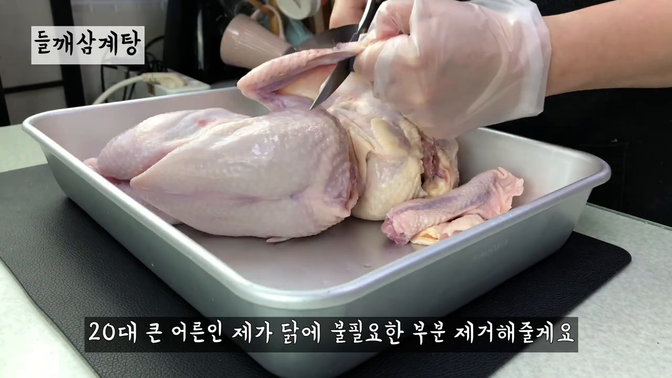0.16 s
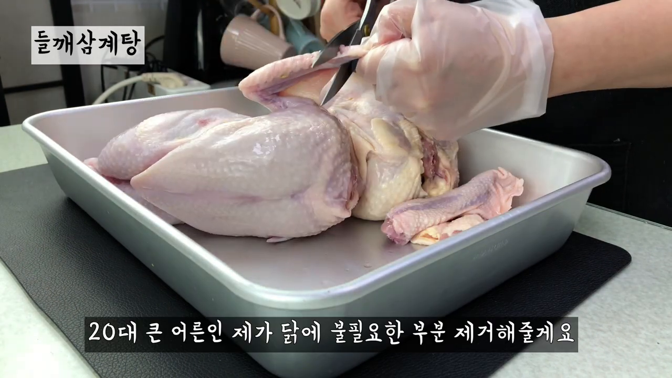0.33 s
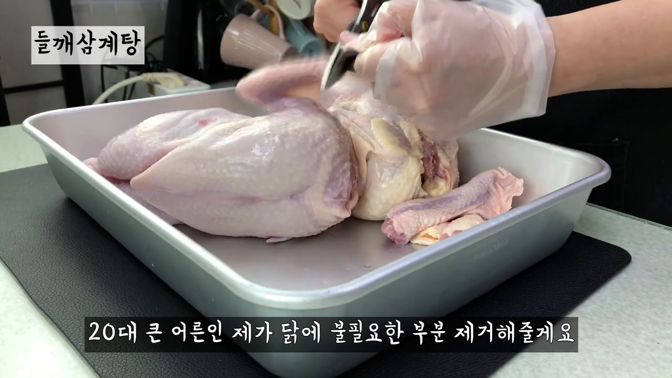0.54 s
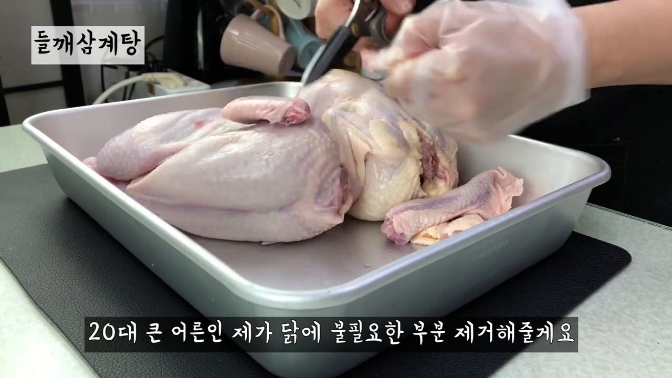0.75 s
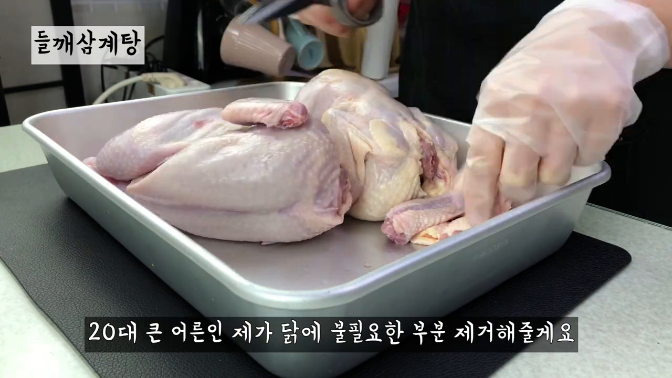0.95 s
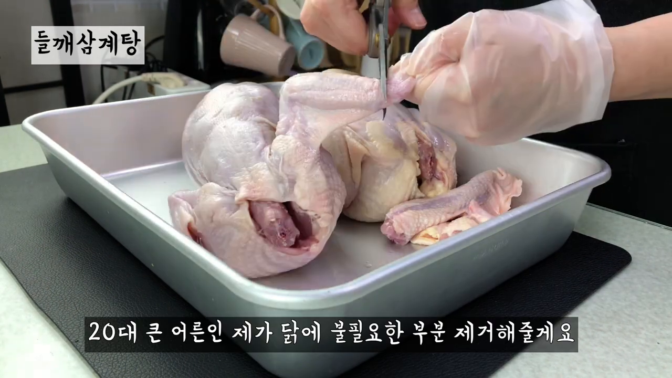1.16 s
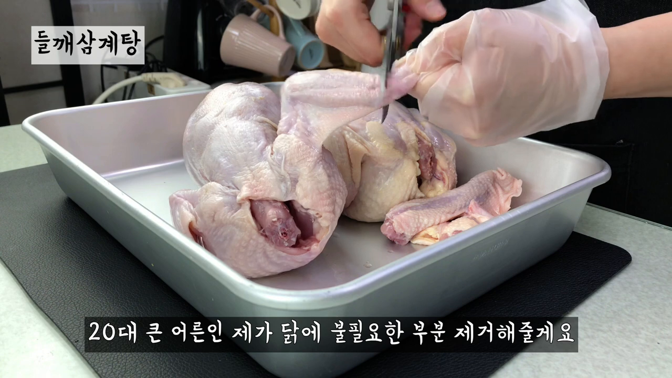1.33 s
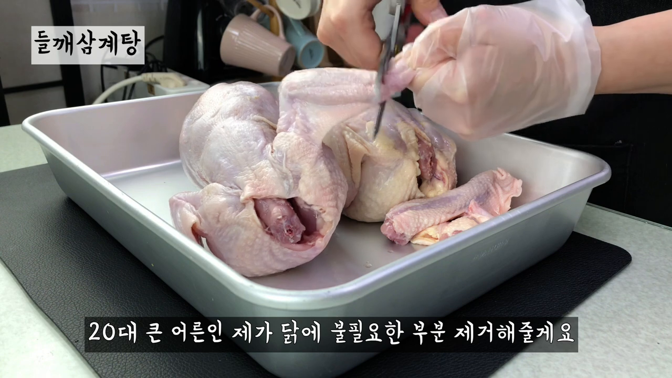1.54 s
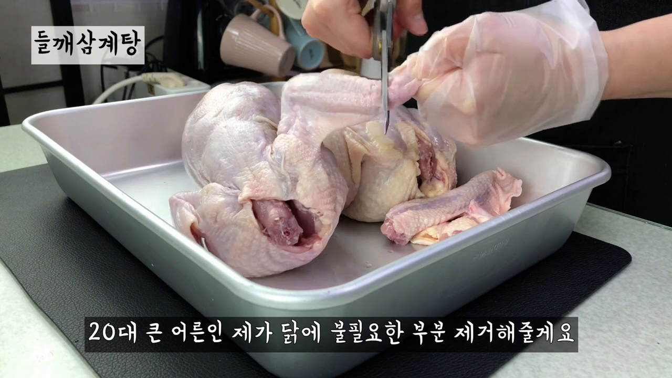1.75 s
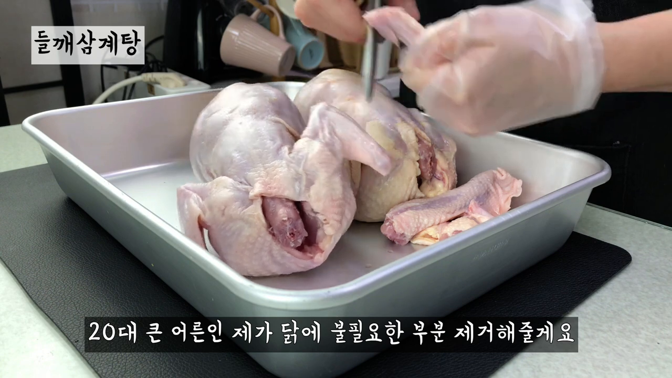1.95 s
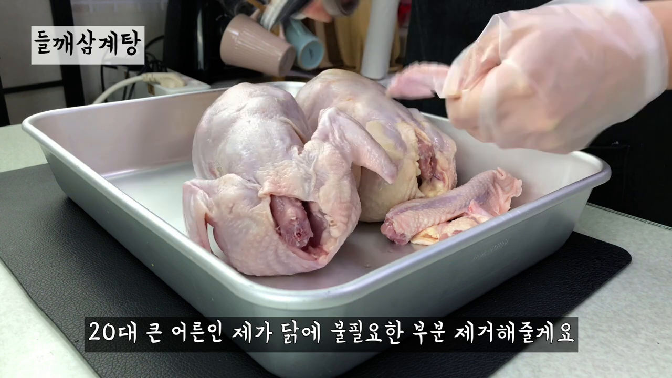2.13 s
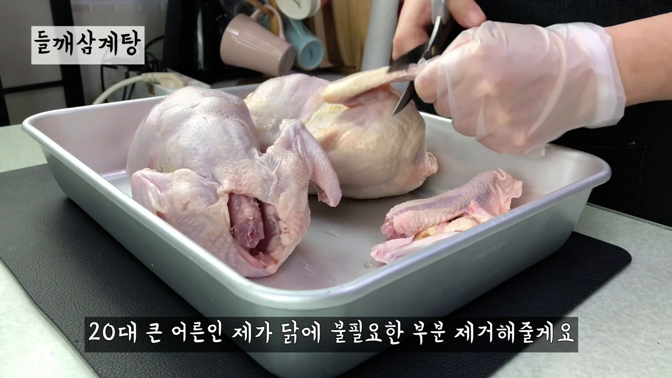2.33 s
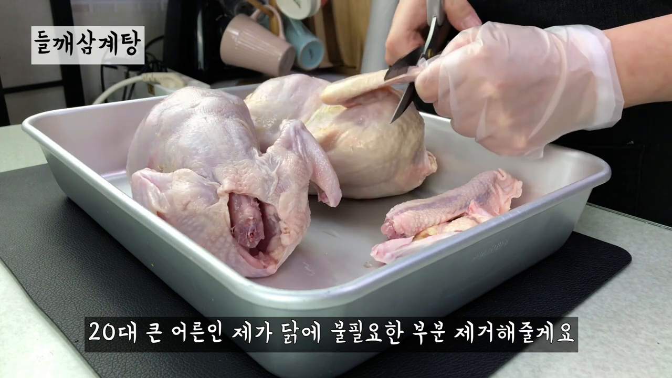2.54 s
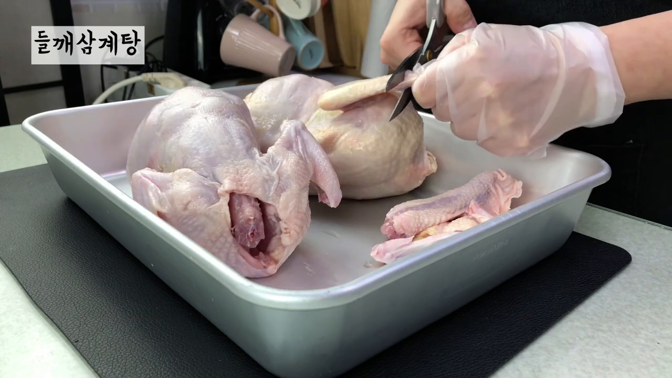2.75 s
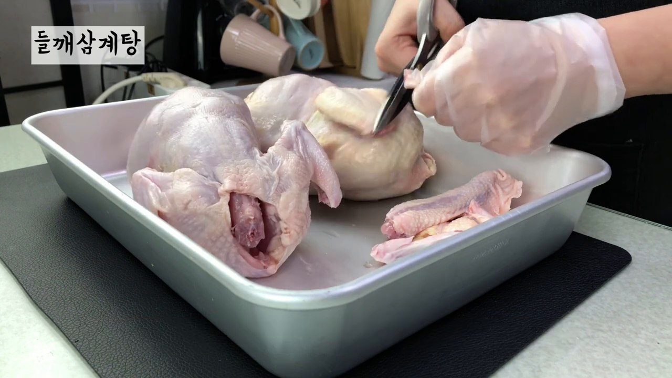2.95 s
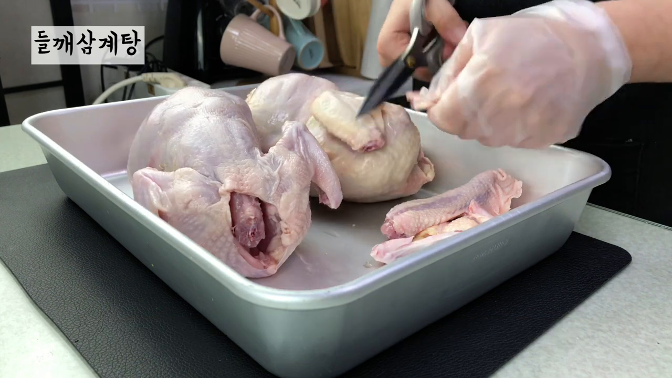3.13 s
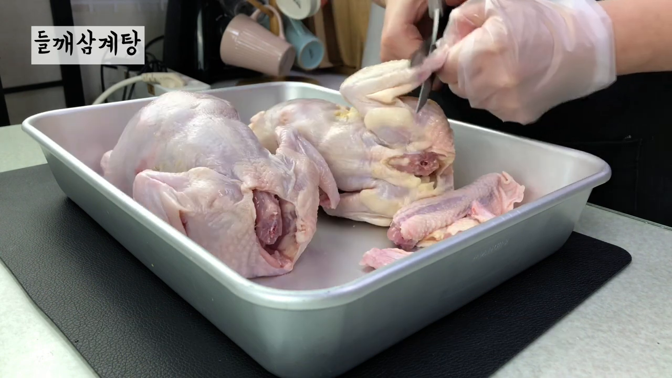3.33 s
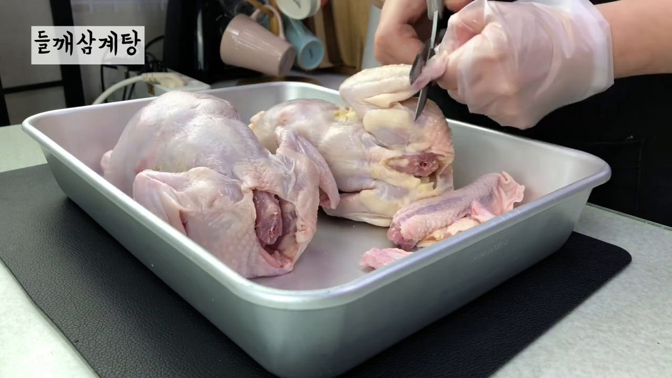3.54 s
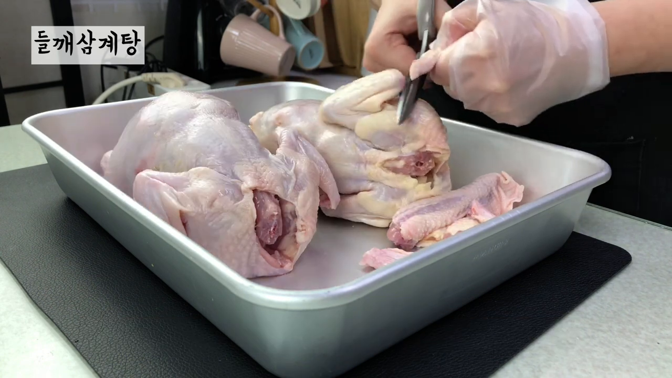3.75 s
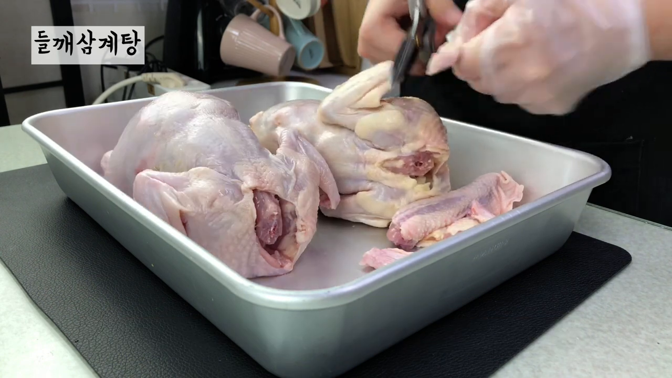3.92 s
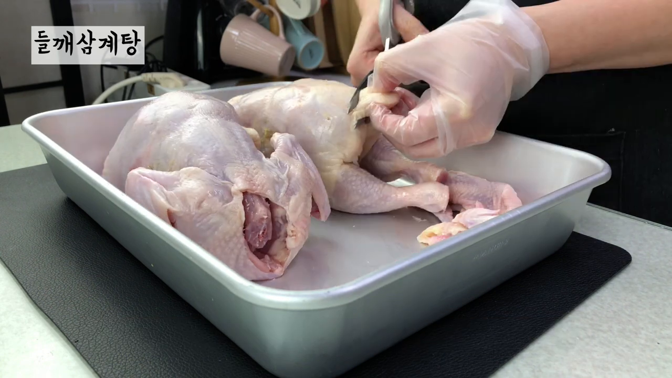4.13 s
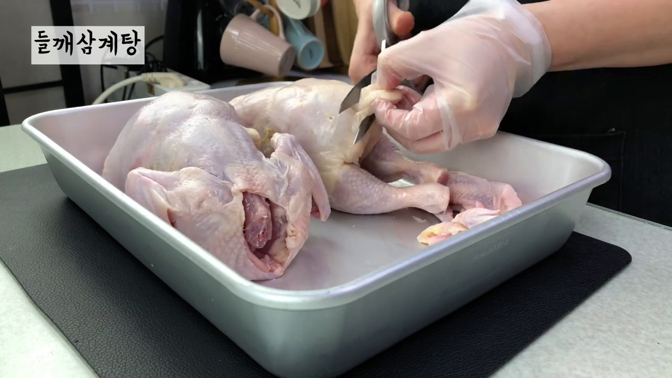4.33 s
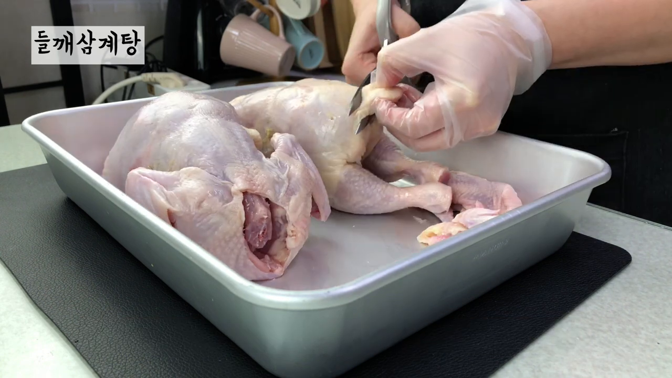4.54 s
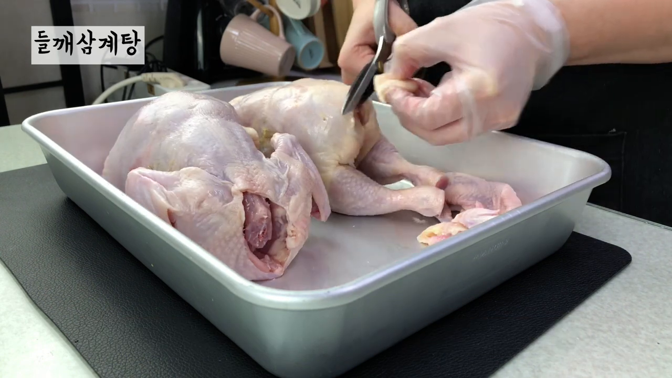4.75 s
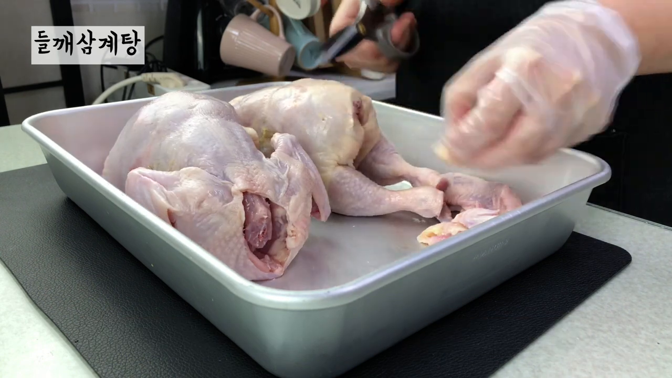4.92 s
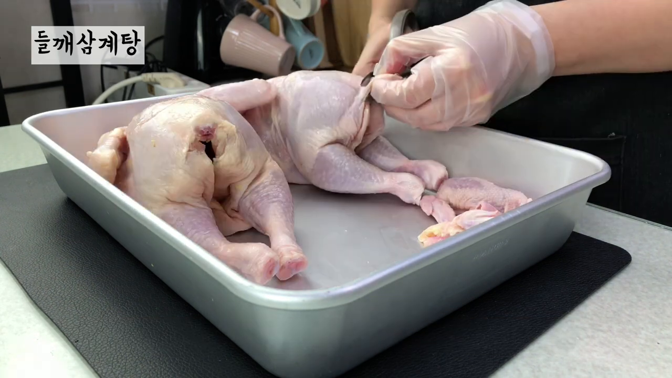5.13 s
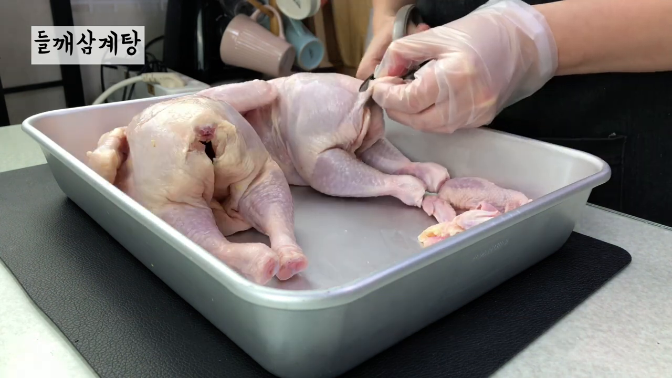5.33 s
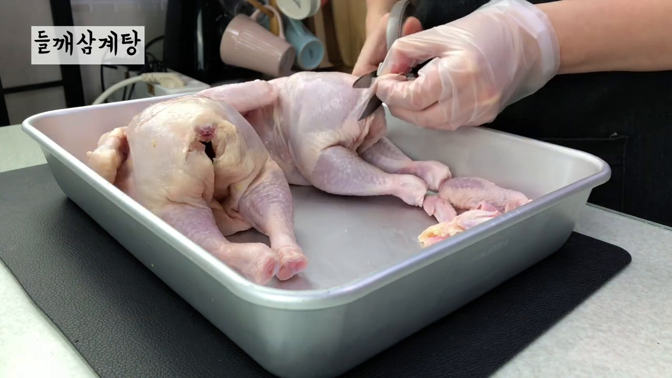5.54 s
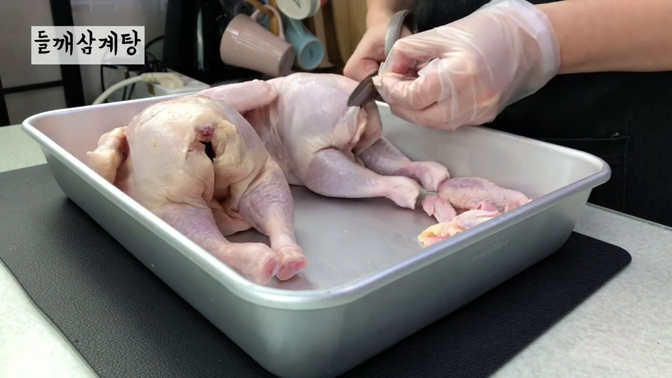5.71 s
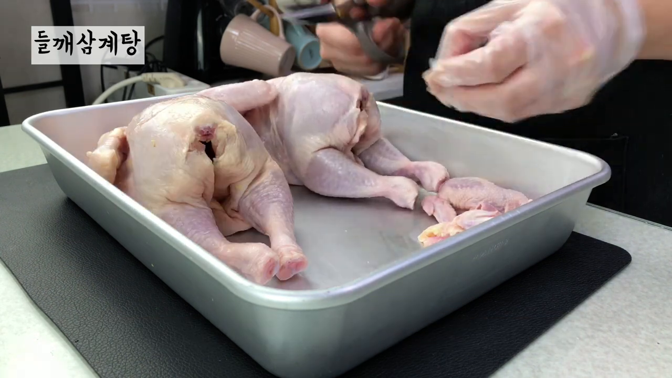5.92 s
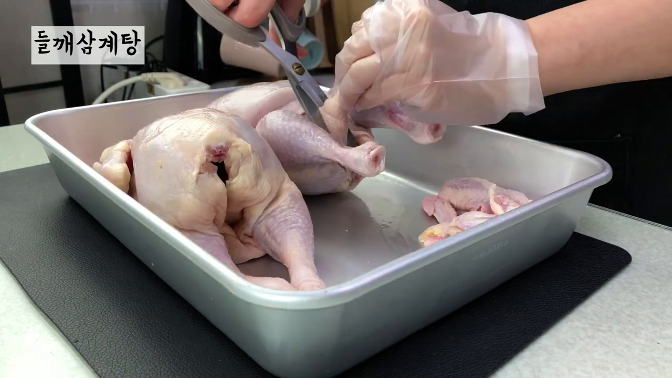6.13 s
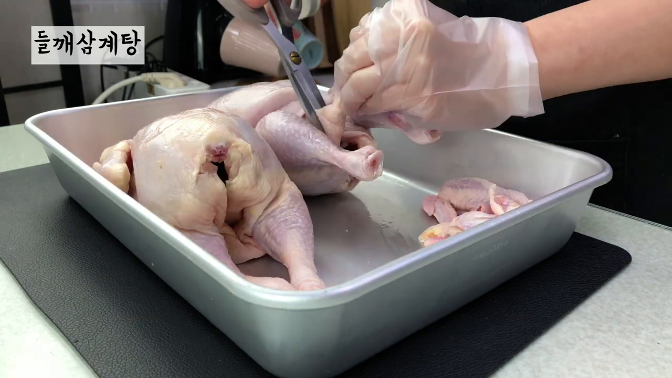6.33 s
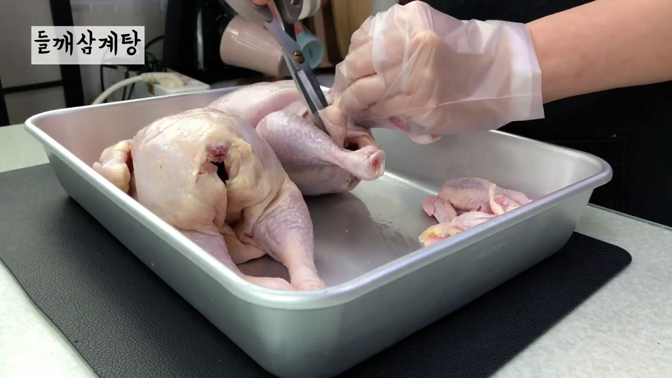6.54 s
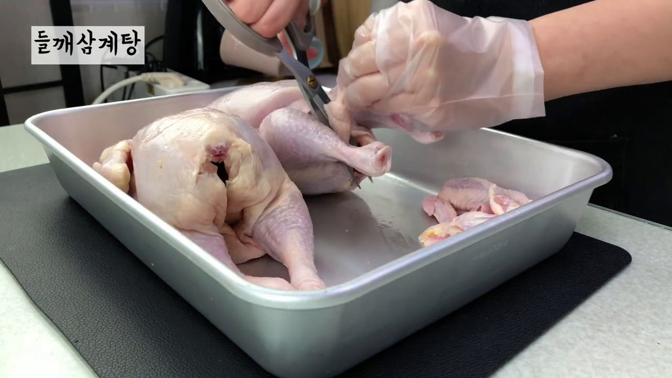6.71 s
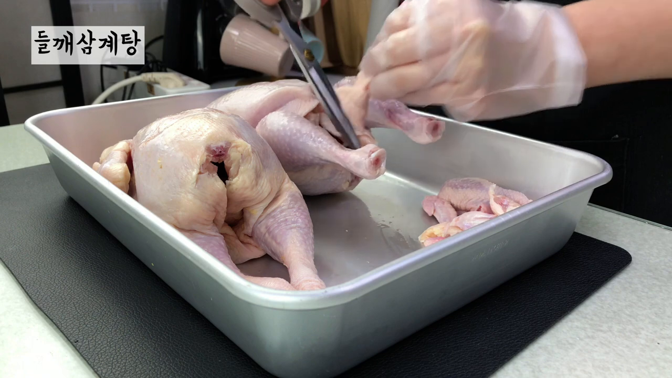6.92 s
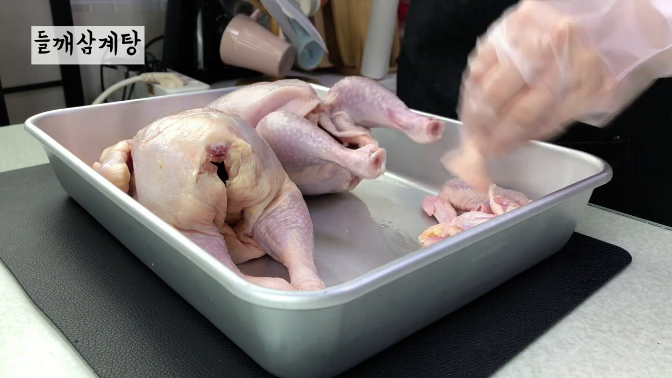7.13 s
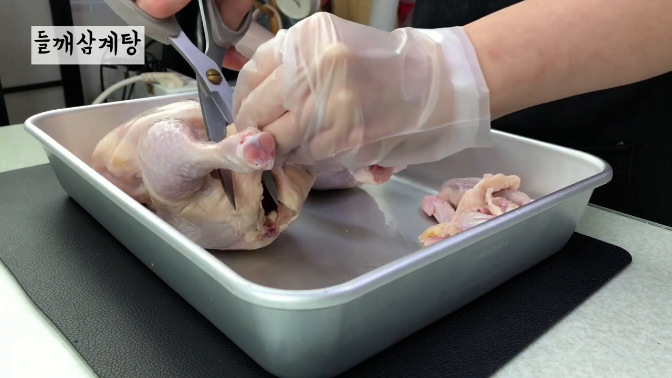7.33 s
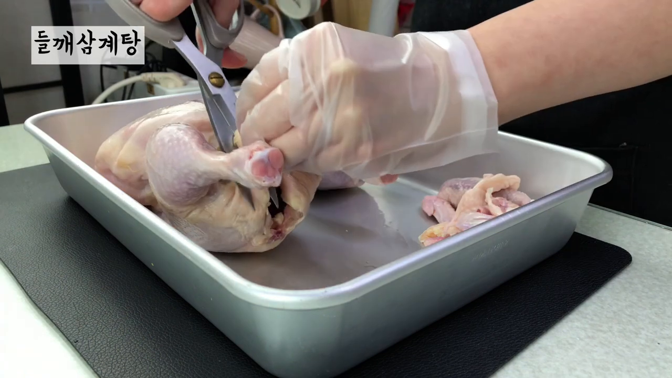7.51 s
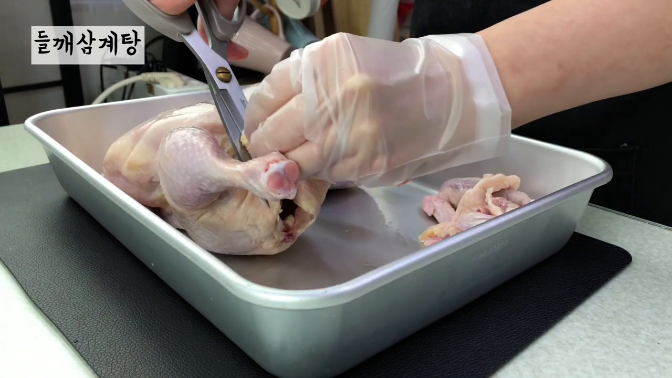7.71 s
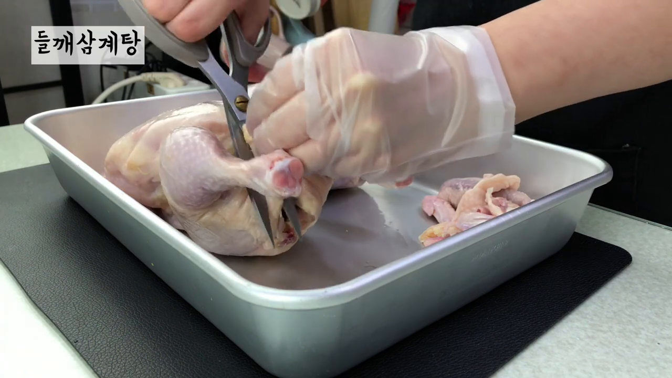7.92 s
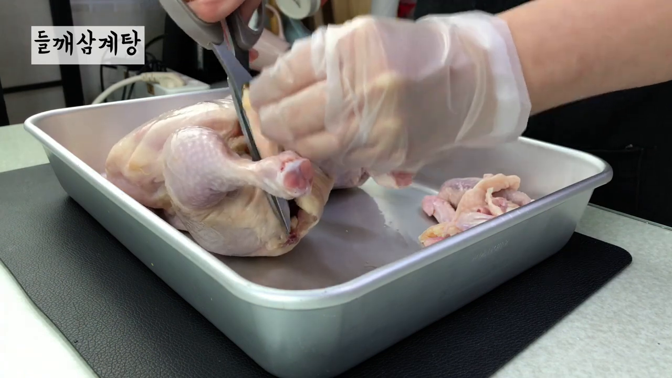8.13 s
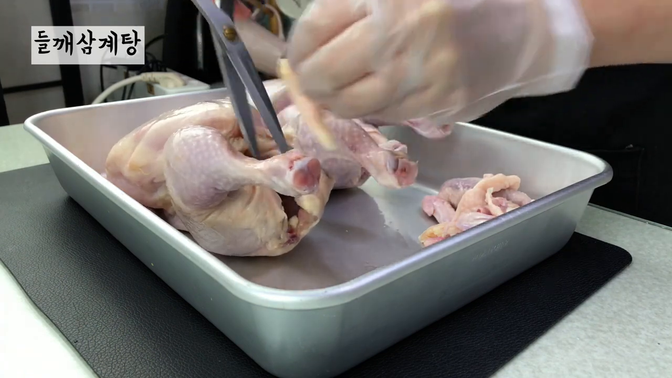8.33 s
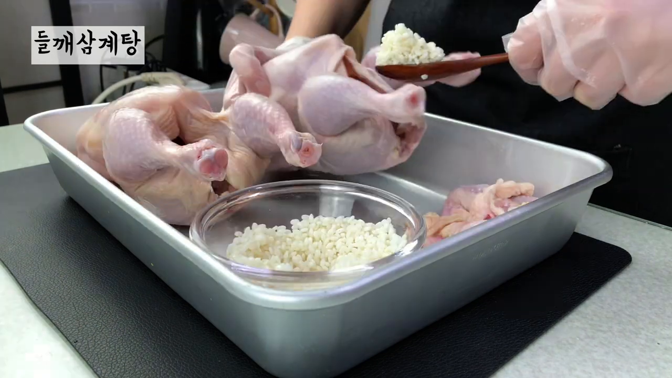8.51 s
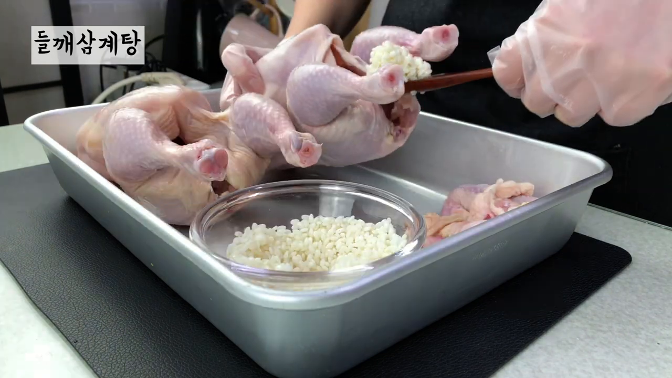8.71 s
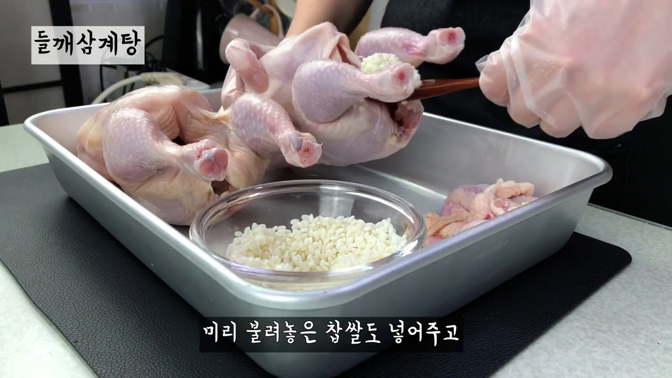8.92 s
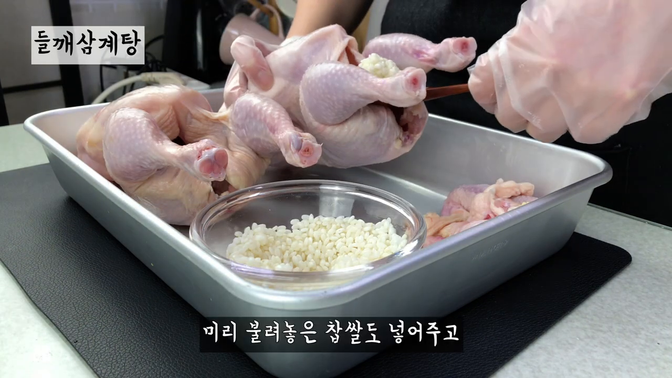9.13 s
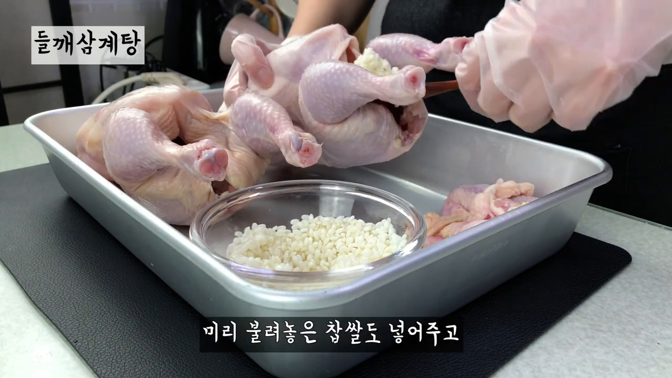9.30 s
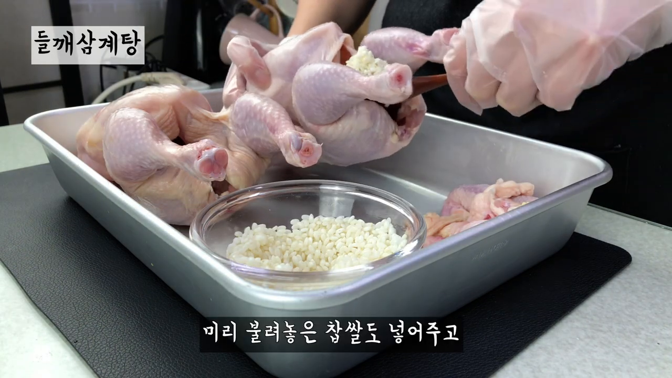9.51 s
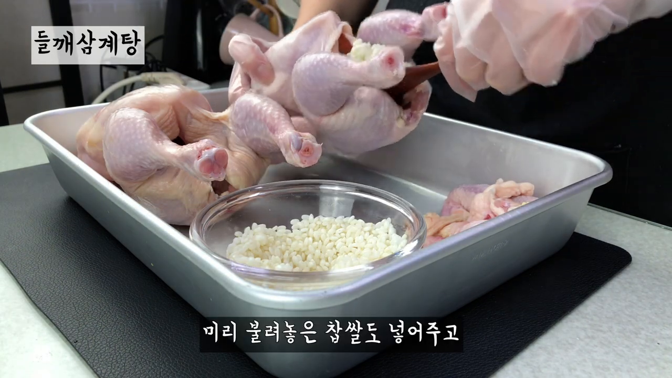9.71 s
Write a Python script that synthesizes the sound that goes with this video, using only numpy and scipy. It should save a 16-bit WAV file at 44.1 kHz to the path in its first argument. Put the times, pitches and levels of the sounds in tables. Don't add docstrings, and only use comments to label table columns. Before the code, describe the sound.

Eight loud metallic scissor snips cut raw poultry over a steel tray, small cracks and plastic glove rustles between them, in a hard kitchen.

```python
import sys
import numpy as np
from scipy import signal
from scipy.fft import rfft, irfft
from scipy.io import wavfile
from scipy.ndimage import uniform_filter1d

SR = 44100
rng = np.random.default_rng(int(sys.argv[2]) if len(sys.argv) > 2 else 0)


def rack_gain(trim_db):
    fader = np.asarray(trim_db, float)
    return 10 ** (fader / 20)


def log_audio(samples):
    frames = np.atleast_2d(samples).T
    limited = np.clip(frames, -1, 1)
    pcm = np.round(limited * 32767).astype(np.int16)
    wavfile.write(sys.argv[1], SR, pcm)


N = 434826

# pitch in Hz, width in Hz, level in dB.
BLADES = [(1477, 9.6, -12), (2460, 1080, -13), (3300, 310, -11.5), (4650, 990, -8.5), (5270, 200, -6),
          (6000, 1100, 2.5), (7500, 730, -3.5), (7500, 1700, -5), (8760, 470, -3), (11000, 940, -15),
          (12430, 1320, -63), (15300, 970, -67)]
# pitch in Hz, width in Hz, level in dB.
KNOCK = [(417, 590, -21.5), (964, 200, 7.5), (1430, 2300, 0)]
SILENT_DB = -15.5


def evened(x):
    return x / np.sqrt(np.mean(x ** 2) + 1e-20)


def read(points, hz):
    f, value = np.transpose(points)
    return np.interp(np.log(hz + 1), np.log(f + 1), value)


def add(mix, s, sound):
    part = mix[round(s * SR):][:len(sound)]
    part += sound[:len(part)]


def unroll(rows):
    s, *columns = np.transpose(rows)
    t = np.arange(s[0], s[-1], 1 / SR)
    return s[0], [np.interp(t, s, c) for c in columns]


def slow_noise(shape, size):
    return evened(uniform_filter1d(rng.standard_normal(shape), size))


def resonate(x, hz, width):
    turn = np.exp(2j * np.pi * np.cumsum(hz * np.ones(len(x))) / SR)
    r = np.exp(-np.pi * width / SR)
    return 2 * (turn * signal.lfilter([1 - r], [1, -r], x / turn)).real


def ring(x, modes, shift=1):
    return sum(rack_gain(db) * resonate(x, hz * shift, width) for hz, width, db in modes)


def colour(x, gain_db):
    return irfft(rfft(x) * rack_gain(gain_db(np.fft.rfftfreq(len(x), 1 / SR))), len(x))


def dull_cut(x, hz):
    return signal.lfilter(*signal.butter(N=2, Wn=hz, btype="high", fs=SR), x)


def grains(count, per_s, spread_db, smooth):
    size = rack_gain(spread_db * np.minimum(rng.exponential(1, count), 4)) * rng.standard_normal(count)
    slips = size * (rng.random(count) < per_s / SR)
    return evened(slips) + smooth * rng.standard_normal(count)


def hiss():
    # frequency in Hz, level in dB per Hz.
    hiss_colour = [(18, -40), (30, -2.5), (152, 4.5), (270, 3), (468, -1.5), (562, 1), (855, -0.5),
                   (924, 2.5), (1270, 3.5), (2080, -7), (4000, -5), (5060, -6.5), (15600, -14),
                   (15950, -36)]
    # centre in Hz, width in Hz, level in dB.
    fans = [(125.6, 79, 1), (396, 330, -8), (1028, 24, -7.5), (1235, 22.3, 4.5), (3420, 72, -10),
            (4043, 153, -4), (9160, 600, -18), (10500, 500, -15)]
    # time in seconds, level in dB.
    fan_load = [(0, -1), (0.71, 4), (1.34, -0.5), (1.46, -5), (2.14, -26), (2.28, 6), (2.44, 0), (4.2, 3),
                (4.67, -3), (5.46, 3.5), (6.65, -0.5), (9.86, 1)]
    # time in seconds, level in dB, running water in dB against the hiss.
    drift = [(0, -66, -12), (1.05, -65.5, -8), (1.6, -67, -5), (2.15, -67, -3.5), (2.3, -66, 2),
             (3, -65.5, 2), (4.2, -65.5, -4), (6.9, -65, 2), (8.3, -65.5, 6), (8.5, -64.5, 12),
             (9.4, -65, 12.5), (9.86, -63.5, 12.5)]
    # frequency in Hz, level in dB per Hz.
    water_colour = [(500, -46), (1000, -6.5), (1700, 1), (2500, -2.5), (5000, -18), (10000, -20)]
    wander_db = 1.5

    frames, hz = N // 256 + 5, np.fft.rfftfreq(1024, 1 / SR)
    a, b, patches = rng.standard_normal((frames, 513, 3)).T
    patches = evened(uniform_filter1d(uniform_filter1d(patches, 10, 0), 14, 1))
    s, level_db, water_db = np.transpose(drift)
    t = np.arange(frames) * 256 / SR

    wander = slow_noise((len(fans), frames), 60)
    wander[3] = .4 * wander[3] + np.interp(t, *np.transpose(fan_load)) / wander_db
    bands = 0
    for (f, width, db), w in zip(fans, wander):
        shape = 1 / (1 + (2 * (hz - f) / (width + 15)) ** 2) ** 2
        bands = bands + rack_gain(2 * (db + 3.5)) * shape[:, None] * rack_gain(2 * wander_db * w)

    water = rack_gain(2 * (read(water_colour, hz)[:, None] - 20.5 + np.interp(t, s, water_db)))
    power = 0.22 * rack_gain(2 * read(hiss_colour, hz))[:, None] + bands
    z = (a + 1j * b) * np.sqrt((power + water) / power.mean())
    z *= rack_gain(np.interp(t, s, level_db)) * rack_gain(.8 * patches)
    return rack_gain(15.5) * signal.istft(z, nperseg=1024, noverlap=768)[1][:N] / np.sqrt(1024)


def hum():
    # pitch in Hz, level in dB rms.
    tones = [(118.4, -82), (398.4, -68), (1012, -68), (1206, -64.5), (1308, -65.5)]
    waver = slow_noise((len(tones), N), 9000)
    hz, db = np.transpose(tones)[:, :, None]
    turns = np.cumsum(hz * (1 + .006 * waver), axis=1) / SR
    return (rack_gain(db - 3.0) * np.sin(2 * np.pi * turns)).sum(axis=0)


def kitchen(x):
    # frequency in Hz, time to die by 60 dB in seconds.
    decay = [(500, 0.36), (1300, 0.41), (3500, 0.37), (6500, 0.34), (9500, 0.29), (14000, 0.23)]
    # delay in seconds, level in dB against the whole tail.
    echoes = [
        (.0128, -12),
        (.0155, -7),
        (.0192, -12),
    ]
    gap_s = .0125
    first_wall_db, first_wall_s = 3, 0.0243

    taps = np.zeros(SR // 3)
    at = np.arange(0, SR // 3 - 6, 6)
    sizes = rng.choice([-1., 1.], len(at)) * rack_gain(2 * rng.standard_normal(len(at)))
    taps[at + rng.integers(0, 6, len(at))] = sizes
    taps *= rack_gain(1.3 * slow_noise(len(taps), 120))
    hz, t, z = signal.stft(taps, SR, nperseg=256)
    tail = signal.istft(z * rack_gain(-60 * t / read(decay, hz)[:, None]), SR, nperseg=256)[1]

    t = np.arange(len(tail)) / SR
    tail = tail * np.interp(t, [0, gap_s - .0015, gap_s], [.5, .22, 1])
    tail = tail * rack_gain(first_wall_db * np.exp(-np.maximum(t - gap_s, 0) / first_wall_s))
    tail = tail / np.linalg.norm(tail)
    for s, db in echoes:
        tail[round(s * SR * rng.uniform(.98, 1.02))] += rack_gain(db - 6.5)
    return signal.fftconvolve(x, tail)[:N]


def thud(s, peak_db, hz, width, rise_s):
    t = np.arange(6000) / SR
    envelope = (1 - np.exp(-t / rise_s)) * np.exp(-np.pi * width * t / 2)
    return s, rack_gain(peak_db) * np.sin(2 * np.pi * hz * t) * envelope


def all_thuds():
    # start in seconds, peak in dB, pitch in Hz, width in Hz, rise in seconds.
    thud_rows = [(0.4, -45, 350, 78, 0.008), (1.716, -36, 397, 200, 0.002),
                 (1.679, -33.5, 900, 260, 0.00088), (3.7, -31, 1750, 420, 0.0009),
                 (7.224, -34, 1260, 400, .001), (2.79, -30, 960, 500, 0.00075),
                 (3.645, -38, 980, 60, 0.0016), (4.1, -49, 234, 23.15, 0.021),
                 (7.21, -32, 1550, 380, 0.0023), (5.679, -30, 820, 130, 0.0023),
                 (6.833, -24.5, 850, 241, 0.00095), (8.045, -29, 780, 77, 0.0018),
                 (7.57, -40, 570, 66.67, 0.0082), (7.61, -46, 570, 44.44, 0.0078)]
    return [thud(*row) for row in thud_rows]


def tugs():
    # time in seconds, level in dB, lowest mode in Hz, hold in seconds.
    pulls = [
        (3.331, -56, 227, 0.078),
        (3.495, -46, 220, .07),
        (3.65, -49, 216, .02),
        (3.782, -46, 237, 0.022),
        (3.93, -50.5, 228, .03),
        (4.02, -52, 231, 0.027),
        (4.15, -61, 242, 0.045),
        (4.4, -61, 234, 0.036),
        (4.828, -60.5, 241, 0.03),
    ]
    rise_db_per_s, fall_db_per_s = 300, 229
    at, peak_db, hz, hold_s = np.transpose(pulls)
    t = np.arange(at[0] - .1, at[-1] + 0.29, 1 / SR)
    since = t - at[:, None]
    fall_db = -fall_db_per_s * np.maximum(since - hold_s[:, None], 0)
    levels_db = peak_db[:, None] + np.minimum(rise_db_per_s * since, fall_db)
    lowest_hz = uniform_filter1d(hz[levels_db.argmax(axis=0)], size=600)
    return t[0], (levels_db.max(axis=0), lowest_hz)


def drag():
    # pitch in Hz, width in Hz, level in dB; the first one is replaced by the moving mode.
    tray = [(223, 9.9, 1.5), (365, 14, -1.5), (610, 13, -6), (1011, 13, 0), (755, 35, -16), (172, 25, -1.5)]
    s, (level_db, lowest_hz) = tugs()
    rub = grains(len(level_db), 600, 2, 1)
    lowest = resonate(resonate(rub, lowest_hz, 20), lowest_hz, 20)
    lowest = lowest / np.sqrt(uniform_filter1d(lowest ** 2, size=5000) + 1e-9)
    x = evened(lowest) + rack_gain(-5.0) * evened(ring(rub, tray[1:]))
    return s, rack_gain(level_db) * evened(x) * signal.windows.tukey(len(rub), .1)


def squeeze(s, length_s, level_db, swell_db, tilt_db):
    rise_s, fall_s = .01, 0.012
    first_db = level_db - swell_db
    return [(s - rise_s, first_db + SILENT_DB, tilt_db),
            (s, first_db, tilt_db),
            (s + length_s, level_db, tilt_db),
            (s + length_s + fall_s, level_db + SILENT_DB, tilt_db)]


def crinkle(rows):
    # frequency in Hz, level in dB per Hz.
    film_colour = [(710, -35), (1200, -13), (2270, -5.5), (2670, -7), (5390, 3.5), (6360, 0.5), (8930, 7.5),
                   (15100, 2), (16500, -29)]
    s, (level_db, tilt_db) = unroll(rows)
    x = 0
    for hz in np.geomspace(2100, 13500, 8):
        crease = grains(len(level_db), 500, 2, 1.2)
        crease = resonate(resonate(crease, hz, .3 * hz), hz, .4 * hz)
        x = x + rack_gain(read(film_colour, hz) + tilt_db * np.log2(hz / 6500)) * crease
    x = dull_cut(x, 1700) / rack_gain(abs(tilt_db) * 0.71)
    return s, rack_gain(level_db - 10.0) * evened(x) * signal.windows.tukey(len(x), .06)


def all_crinkles():
    # start in seconds, length in seconds, final level in dB, swell in dB,
    # tilt towards the top in dB per octave.
    rustles = [(0.303, .1, -58, -1, 7), (0.427, 0.041, -45.5, -16, -2), (0.859, 0.16, -38, 7.5, -5),
               (1.023, 0.012, -47, -2, 1), (1.679, 0.027, -51, -14, -11), (1.739, 0.048, -37, -11, -6.5),
               (2.789, 0.095, -44.5, -4, -5.5), (3.147, 0.13, -42, 3.5, -8), (3.604, 0.059, -41, 1, -9),
               (3.992, 0.068, -36.5, 12, -10), (4.062, 0.044, -41, 10, -1), (4.54, 0.041, -38.5, 9, 8),
               (7.194, 0.028, -42, 1, -7), (7.226, 0.019, -49, -8, 2), (8.236, .012, -50, -2, 8),
               (9.739, 0.1, -46.5, 3, -6)]
    return [crinkle(squeeze(*row)) for row in rustles]


def squeak(s, length_s, level_db, rise):
    # pitch in Hz, width in Hz, level in dB.
    pivot = [(5600, 360, 9), (8700, 480, 0), (7300, 600, -10)]
    rub = grains(round(length_s * SR), 3000, 2, 1)
    rings = ring(rub, pivot, np.linspace(1, rise, len(rub)))
    return s, rack_gain(level_db) * evened(dull_cut(rings, 4000)) * signal.windows.tukey(len(rub), .6)


def all_squeaks():
    # start in seconds, length in seconds, level in dB, rise of pitch as a factor.
    openings = [
        (4.906, 0.063, -53, 0.93),
        (5.899, 0.061, -51.5, 1.03),
        (8.23, 0.048, -53, 1.03),
    ]
    return [squeak(*row) for row in openings]


def stroke(s, length_s, level_db, swell_db, first, contact):
    rise_share, fall_s = 0.37, 0.069
    edge_db = -18
    low_start_db, low_end_db = -17.5, 1.5
    middle_db = low_start_db + rise_share * (low_end_db - low_start_db)
    middle = first + rise_share * (contact - first)
    return [(s, level_db - swell_db + edge_db, first, low_start_db),
            (s + rise_share * length_s, level_db - swell_db, middle, middle_db),
            (s + length_s, level_db, contact, low_end_db),
            (s + length_s + fall_s, level_db + edge_db, contact, low_end_db)]


def slide(rows, rings_db):
    # pitch in Hz, width in Hz, level in dB.
    blade_rings = [(2466, 140, 7.5), (3430, 120, 7.5), (4210, 150, 6.5), (7000, 380, 0.5), (11600, 390, 1),
                   (13100, 300, 0.5), (14600, 500, -3), (5600, 150, -7)]
    # frequency in Hz, level in dB.
    rasp = [(1800, -15), (2500, -2.5), (4000, -27), (5500, -12), (9500, -9.5), (12500, -9.5), (15000, -11)]
    s, (level_db, contact, low_db) = unroll(rows)
    rub = grains(len(level_db), 2500, 2.6, 1.0)
    travel = np.clip(contact, .7, 1.2)
    wobble = np.linspace(.98, 1.02, len(rub)) + .025 * slow_noise(len(rub), 900)
    x = rack_gain(low_db + rings_db) * ring(rub, blade_rings[:3], wobble)
    x = x + ring(rub, blade_rings[3:4], travel)
    x = x + ring(rub, blade_rings[4:], travel ** 0.288)
    x = x + colour(rub, lambda hz: read(rasp, hz))
    x = x * rack_gain(1.8 * slow_noise(len(rub), 250))
    return s, rack_gain(level_db - 8.0) * evened(dull_cut(x, 1500)) * signal.windows.tukey(len(x), .1)


def all_slides():
    # start in seconds, length in seconds, final level in dB, swell in dB, narrow low rings in dB.
    strokes = [
        (6.206, 0.19, -41.5, -5, 6.5),
        (6.702, 0.13, -36.5, -1, 4),
        (7.435, 0.15, -36, 3.5, -0.5),
        (7.908, 0.15, -37, -5.5, 2),
    ]
    travels = [
        (.85, 1.12),
        (.9, 1.15),
        (.88, .98),
        (.92, 1.0),
    ]
    return [slide(stroke(*row, *travel), rings_db) for (*row, rings_db), travel in zip(strokes, travels)]


def burst(length_s, chatter):
    rise_s = .00025
    t = np.arange(1100) / SR
    fading = (1 - np.exp(-t / rise_s)) * np.exp(-t / np.clip(length_s, .0002, .012))
    impact = np.arange(len(t)) == round(rise_s * SR)
    return impact + chatter * rng.standard_normal(len(t)) * fading


def strike(body, length_s, chatter, build_s):
    direct, even = body(burst(length_s, chatter)), body(burst(.001, 0))
    build = 1 - np.exp(-np.arange(len(direct)) / (build_s * SR))
    direct, even = direct * build ** 2, even * build
    direct = direct / abs(direct).max()
    return np.array([direct, even * np.linalg.norm(direct) / np.linalg.norm(even)])


def snap(x, hz, edge_db):
    focus = resonate(resonate(x, hz, 0.61 * hz), hz, 0.39 * hz)
    edge = rack_gain(edge_db) * np.diff(x, prepend=0)
    return dull_cut(focus + 0.35 * ring(x, BLADES[1:9:2]) + edge, 0.23 * hz)


def tick(peak_db, hz, edge_db, length_s, knock_db=-60):
    def body(x):
        return snap(x, hz, edge_db - 11.0) + rack_gain(knock_db) * dull_cut(ring(x, KNOCK), 410)
    return rack_gain(peak_db) * strike(body, length_s, 0.18, .00008)


def all_ticks():
    # start in seconds, peak in dB,
    # centre in Hz, length in seconds.
    cracks = [(0.308, -30, 2540, 0.0024), (0.317, -24, 2730, 0.0025), (0.3465, -26, 2500, 0.0035),
              (.3466, -25, 9000, 0.0022), (0.379, -35, 11000, 0.0015), (.4155, -42, 9000, .003),
              (0.422, -24, 2700, 0.0035), (0.429, -27, 9000, .002), (0.4304, -22, 3000, 0.0051),
              (.4312, -17, 9000, .003), (1.678, -23, 2500, 0.003), (1.7152, -12.5, 5050, 0.0019),
              (1.7282, -14.5, 3500, 0.002), (1.7412, -12, 5380, .002), (1.7492, -10, 11600, 0.003),
              (1.7505, -18, 2500, .002), (1.7645, -21, 3500, .004), (1.7882, -12, 3200, .0012),
              (1.7615, -27, 6000, 0.006), (2.66, -26, 8700, 0.0033), (2.786, -25, 2700, 0.002),
              (2.794, -26, 6000, .004), (2.8487, -21, 3990, 0.0025), (2.8632, -17, 11300, 0.0022),
              (3.611, -24, 10500, 0.001), (3.618, -25, 9000, 0.0037), (3.643, -18.5, 3510, 0.005),
              (3.645, -19, 5600, .0036), (4.573, -42, 11500, .0012), (6.251, -30, 2430, 0.0026),
              (6.4095, -26, 3420, .0018), (7.563, -20.5, 2420, 0.0035), (7.579, -27, 2400, .003),
              (7.605, -31, 5500, .002), (7.616, -35, 2300, .002), (6.296, -39, 6800, .003),
              (6.306, -31, 2600, .003), (6.383, -32, 4200, .002), (5.6525, -26, 1200, .003),
              (7.947, -36, 6000, .0022)]
    # start in seconds, peak in dB, centre in Hz.
    snaps = [(1.3484, -23.5, 8500), (1.929, -25, 12000), (2.0872, -32, 7740), (2.04, -37, 9000),
             (2.102, -35, 6500), (2.137, -38, 5500), (7.507, -39, 13000), (7.463, -36, 6320),
             (2.185, -29, 8700), (2.282, -42, 9100), (2.636, -42, 9100), (3.176, -30, 14400),
             (3.2184, -24, 9500), (4.0063, -31, 5360), (4.0413, -20.5, 9500), (4.042, -25.5, 5200),
             (3.876, -39, 12140), (3.889, -41, 12000), (3.238, -31, 6500), (5.853, -32, 7400),
             (5.9443, -26.5, 8700), (6.423, -25.5, 7300), (6.729, -29, 5200), (7.1688, -29, 5330),
             (7.207, -29, 7500), (7.2315, -20, 10500), (7.236, -20, 8950), (1.4465, -44, 5000),
             (1.493, -43, 12000), (1.604, -45, 6000), (1.624, -44, 8000), (1.315, -48, 8000),
             (7.374, -26.5, 4530), (7.491, -32, 6350), (9.1601, -36, 6300), (9.5114, -27, 10500),
             (9.568, -34, 9000), (9.775, -29, 7150)]
    # start in seconds, peak in dB, centre in Hz.
    smacks = [(0.051, -39, 4220), (0.8259, -35, 5680), (0.946, -30, 4500), (1.222, -36.5, 3930),
              (2.1243, -37, 6500), (2.426, -40, 3930), (3.146, -35, 9000), (3.2588, -40, 6500),
              (4.949, -18, 9400), (4.95, -35, 5400), (4.839, -32.5, 4200), (6.156, -41, 9000),
              (6.611, -31, 6000), (6.472, -24, 4440), (7.1428, -34, 5500), (1.941, -32, 5000),
              (8.466, -33, 4830), (9.2138, -28, 4000), (9.249, -37, 4060), (9.605, -37, 5500),
              (9.734, -36, 3450)]
    # start in seconds, peak in dB, centre in Hz.
    creases = [(.862, -42, 6000), (.8935, -39, 10000), (.9045, -33, 7000), (.909, -32, 12000),
               (.9225, -33, 3800), (.925, -33, 5500), (.957, -29, 8000), (.9705, -34, 10000),
               (.975, -28, 4500), (.979, -29, 9000), (0.996, -34, 4970), (1.004, -39, 5200),
               (1.0108, -33, 10000), (1.019, -32, 7000), (1.0215, -34, 6800), (3.155, -37, 9000),
               (3.1595, -41, 6000), (3.171, -41, 8000), (3.207, -38, 9000), (3.228, -31, 10000),
               (3.2685, -36, 4760), (3.279, -32, 5450), (3.291, -37, 8000), (3.9955, -40, 6900),
               (4.015, -38, 7500), (4.026, -32, 9800), (4.049, -29, 5000), (4.07, -34, 4500),
               (4.076, -29, 10500), (4.094, -31, 4500), (4.1015, -41, 9000), (4.111, -31.5, 5000),
               (4.126, -37, 11000), (7.184, -38, 4000), (6.4, -30, 4300), (1.7725, -31, 5000),
               (7.183, -31, 11000), (7.1915, -34, 12000), (7.212, -35, 5500), (7.2245, -32, 4500),
               (9.299, -42.5, 3000), (9.73, -30.5, 9500), (9.816, -42, 10000)]
    # start in seconds, peak in dB, centre in Hz, edge in dB,
    # length in seconds.
    taps = [
        (6.5928, -20.5, 9000, -17, 0.0029),
        (6.593, -26, 2580, -22, 0.003),
        (6.595, -24.5, 5000, -23, 0.0023),
        (7.778, -25.5, 5500, -20, 0.0054),
        (7.779, -25, 11000, -18, 0.0028),
    ]
    # start in seconds, peak in dB, centre in Hz,
    # edge in dB, length in seconds.
    last_ticks = [(.5246, -34, 9000, -12, .001), (.5412, -14, 14500, -8, .001),
                  (.5413, -15, 3000, -20, .002), (2.8908, -33, 6300, -16, .002),
                  (2.9068, -16, 15000, -10, .002), (2.9072, -20, 4000, -20, .002),
                  (4.5945, -25, 12000, -10, .001), (4.5995, -25, 11000, -14, .001),
                  (2.9138, -6, 6200, -24, .0012), (2.92, -12, 7000, -16, .0008),
                  (1.8105, -9, 6050, -20, .0015), (4.6163, -10, 6500, -16, .0006),
                  (4.6174, -10, 6500, -16, .0008), (5.6802, -12, 7900, -24, .001),
                  (5.6822, -13, 7700, -18, .001), (5.6848, -13, 7700, -18, .0015),
                  (8.0452, -9, 6200, -26, .002), (8.047, -7, 6200, -26, .0005)]
    ticks = [(s, db, hz, 0.5, length_s, -14.5) for s, db, hz, length_s in cracks]
    for rows, edge_db, length_s in [(snaps, 2, 0.0037), (smacks, -9, 0.0023), (creases, -19, 0.0017)]:
        ticks += [(*row, edge_db, length_s) for row in rows]
    return ticks + taps + last_ticks


def crunch(s, length_s, level_db, hz, swell_db):
    tear = grains(round(length_s * SR), 9000, 1.8, 1)
    tear = snap(tear, hz, -2.5) + 0.47 * ring(tear, KNOCK) + 0.78 * resonate(tear, 3000, 2300)
    tear = tear * rack_gain(np.linspace(-swell_db, 0, len(tear)))
    return s, rack_gain(level_db) * evened(tear) * signal.windows.tukey(len(tear), .2)


def all_crunches():
    # start in seconds, length in seconds, level in dB, centre in Hz, swell in dB.
    tears = [(0.5359, 0.011, -28, 8000, 18), (1.789, 0.0074, -30, 6000, 2), (2.897, 0.0057, -38.5, 7940, 3),
             (2.904, .004, -28, 8000, 2), (2.9068, 0.008, -24, 7920, -2), (3.69, 0.018, -27.5, 8260, 13),
             (4.591, 0.02, -30.5, 8500, 11), (5.651, 0.0272, -35.5, 7000, -6), (5.673, 0.011, -30, 6540, 8),
             (6.815, 0.017, -35, 7500, 13), (8.036, 0.0084, -32, 8000, 8)]
    return [crunch(*row) for row in tears]


def snip(peak_db, knock_db, lower_db, upper_db, top_db, length_s):
    # pitch in Hz, width in Hz, level in dB.
    blade_tone = [(6170, 190, -1), (7700, 220, -11)]
    chatter = .1
    build_s, knock_lag_s = .0005, .001
    soft = signal.butter(N=1, Wn=13000, fs=SR)
    grip = 1 + .02 * rng.uniform(-0.48, 1)

    def blades(x):
        lower = rack_gain(lower_db) * dull_cut(ring(x, BLADES[:4]), 610)
        upper = ring(x, BLADES[4:7] + blade_tone, grip)
        upper = upper + rack_gain(upper_db) * ring(x, BLADES[7:9], 2 - grip)
        top = rack_gain(top_db + 9.5) * ring(x, BLADES[9:])
        return lower + dull_cut(signal.lfilter(*soft, upper) + top, 2910)

    def handles(x):
        return dull_cut(ring(x, KNOCK), 370)

    steel = dull_cut(strike(blades, length_s, chatter, build_s), 1160)
    knock = strike(handles, 0.0013, 0.061, build_s)
    knock = np.roll(knock, round(knock_lag_s * SR), axis=1)
    return rack_gain(peak_db) * (steel + rack_gain(knock_db) * knock)


def scene():
    # time in seconds, peak in dB.
    slams = [
        (.5480, -1),
        (1.7957, -2),
        (2.9135, -1),
        (3.7090, -1.5),
        (4.6107, -1),
        (5.6783, -2),
        (6.8323, -1),
        (8.0437, -.5),
    ]
    # low knock in dB, lower modes in dB, top in dB, chatter in seconds,
    # freedom to ring into the room in dB.
    snips = [(-27.5, 1, -4, 0.00093, 6.5), (-32, -2.5, -3, 0.0012, 4), (-24, 2.5, -6, 0.0012, 3),
             (-22, 2, -10, 0.0024, -0.5), (-22, 2, -4, 0.0031, -5), (-25.5, 4, -25, 0.0014, -9),
             (-28, 0.5, -28, 0.0035, -4), (-25.5, 3.5, -3.5, 0.0015, -0.5)]
    lag_s = .0004
    near, send = np.zeros(N), np.zeros((3, N))

    for k, ((s, peak_db), (knock_db, lower_db, top_db, length_s, room_db)) in enumerate(zip(slams, snips)):
        upper_db = 2 + 0.28 * room_db
        direct, even = snip(peak_db, knock_db, lower_db, upper_db, top_db, length_s)
        add(near, s, direct)
        add(send[k % 3], s, rack_gain(room_db) * even)

    for k, (s, *how) in enumerate(all_ticks()):
        direct, even = tick(*how)
        add(near, s + lag_s, direct)
        add(send[k % 3], s + lag_s, rack_gain(-13.0) * even)

    rubbing = np.zeros(N)
    layers = all_crinkles() + all_slides() + all_crunches() + all_squeaks() + all_thuds() + [drag()]
    for s, sound in layers:
        add(rubbing, s, sound)
    send[0] += rack_gain(-9.5) * rubbing
    return (near + rubbing + sum(map(kitchen, send)) + hiss() + hum())[None]


def band_limit(x):
    return signal.sosfilt(signal.butter(12, 16800, fs=SR, output="sos"), x)


def record(dry):
    # frequency in Hz, level in dB.
    mic = [(20, -37.5), (40, -1.5), (60, 1.5), (15600, -1), (15850, -30), (16000, -45), (16700, -45),
           (17200, -56)]
    knee, ceiling = .72, 1.0
    heard = colour(dry[0], lambda hz: read(mic, hz))[None]
    over = np.maximum(abs(heard) - knee, 0) / (ceiling - knee)
    heard = np.sign(heard) * (np.minimum(abs(heard), knee) + (ceiling - knee) * np.tanh(over))
    return band_limit(heard)


dry = scene()
out = record(dry)
log_audio(out)
```